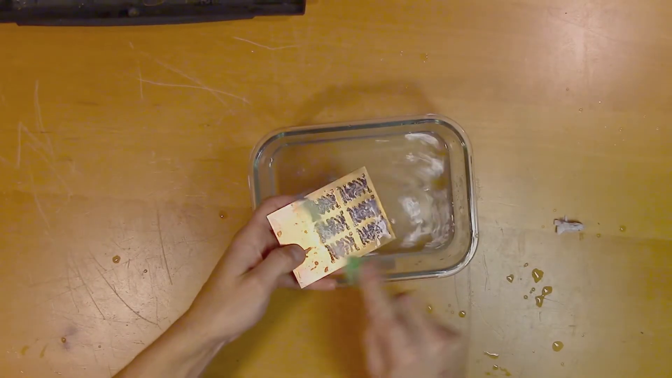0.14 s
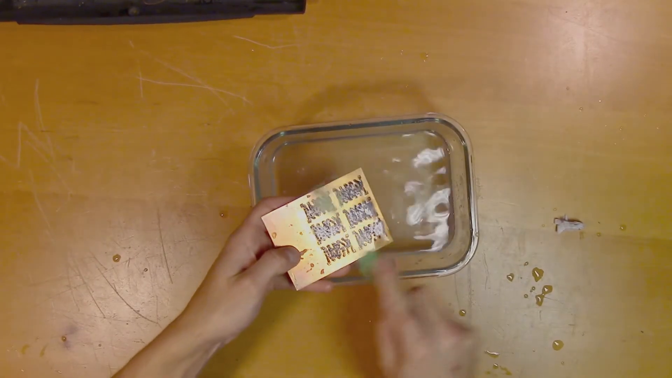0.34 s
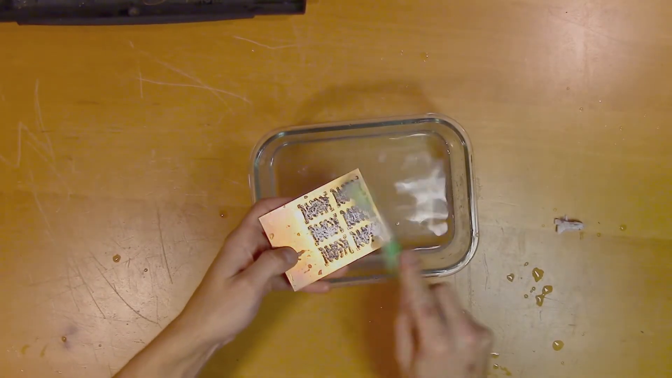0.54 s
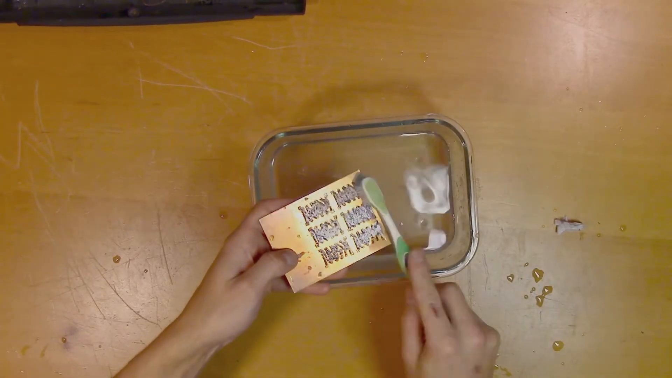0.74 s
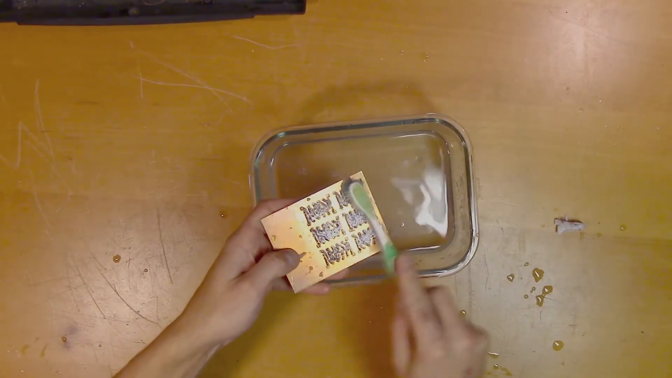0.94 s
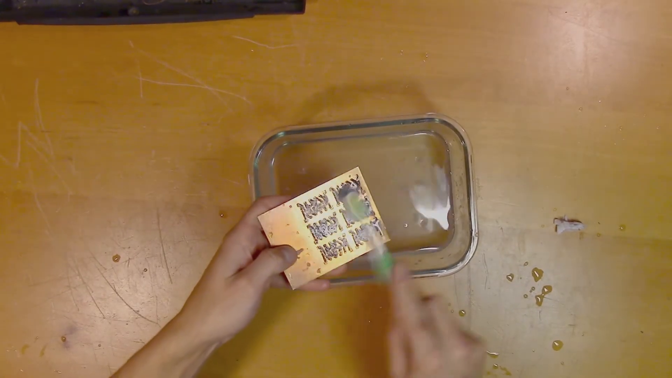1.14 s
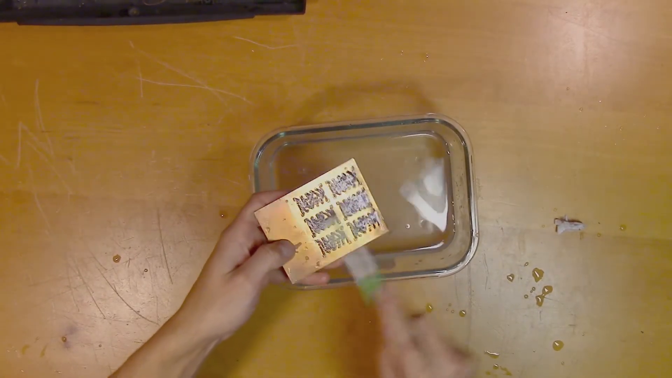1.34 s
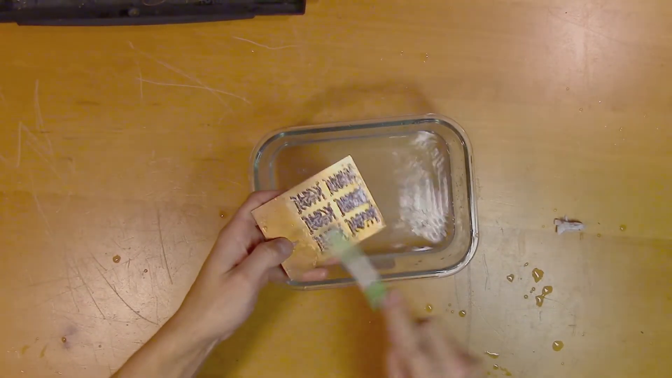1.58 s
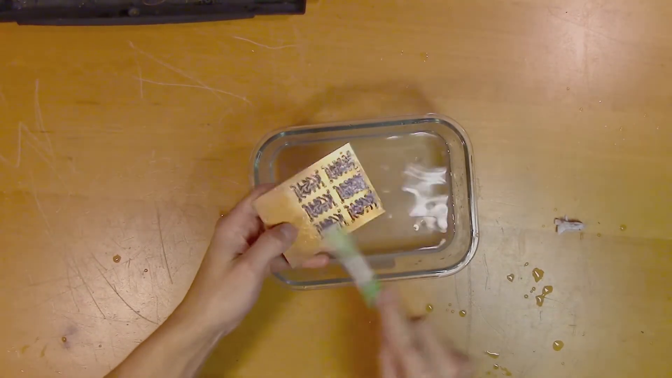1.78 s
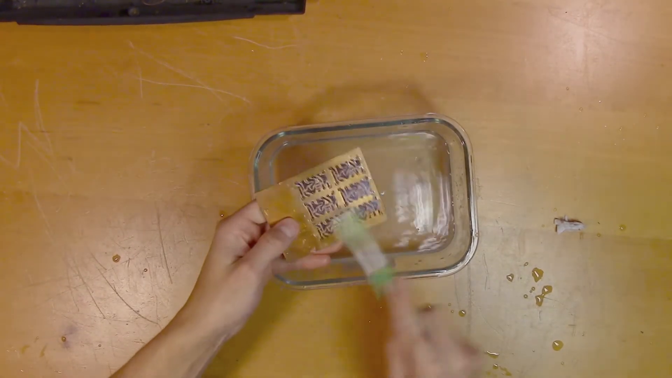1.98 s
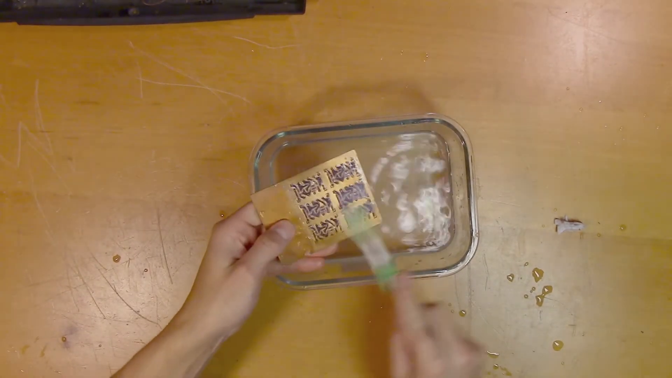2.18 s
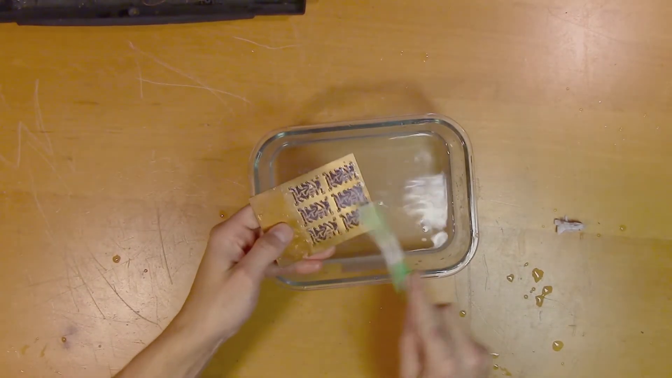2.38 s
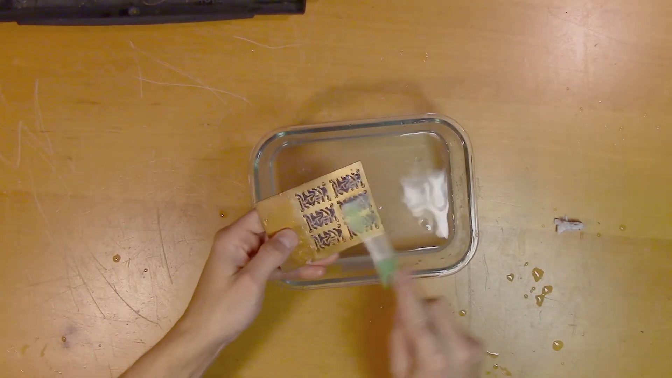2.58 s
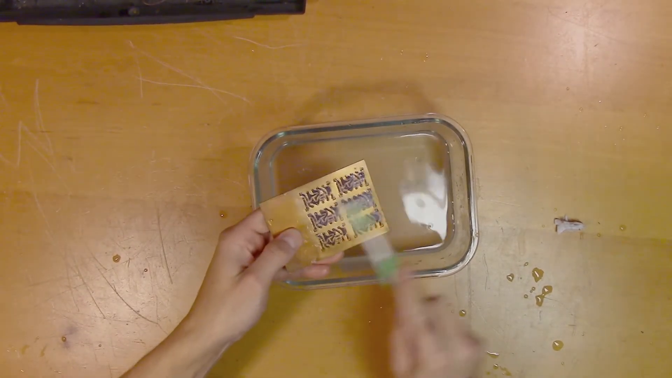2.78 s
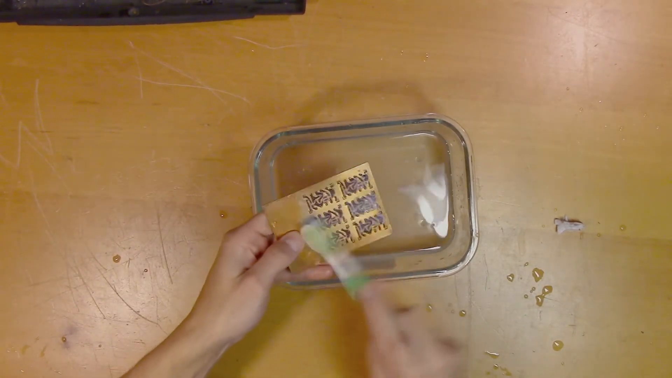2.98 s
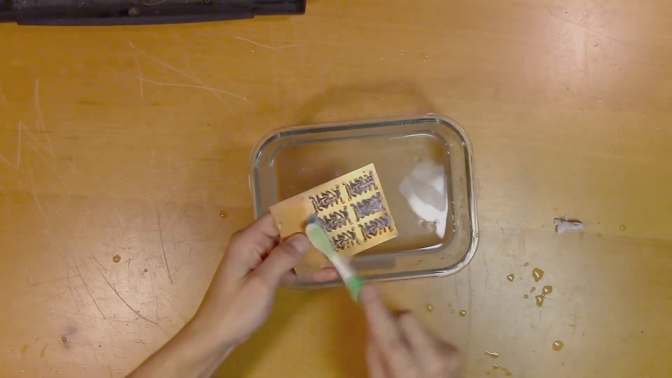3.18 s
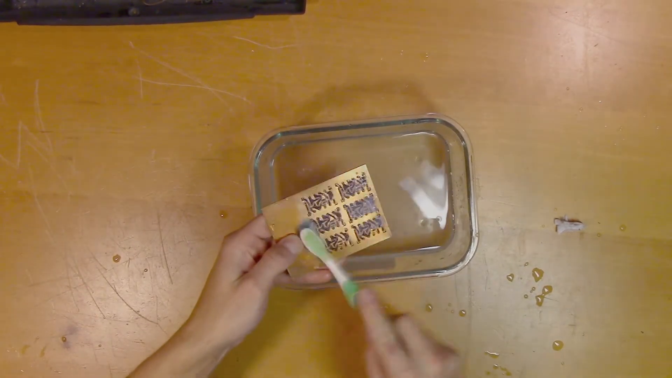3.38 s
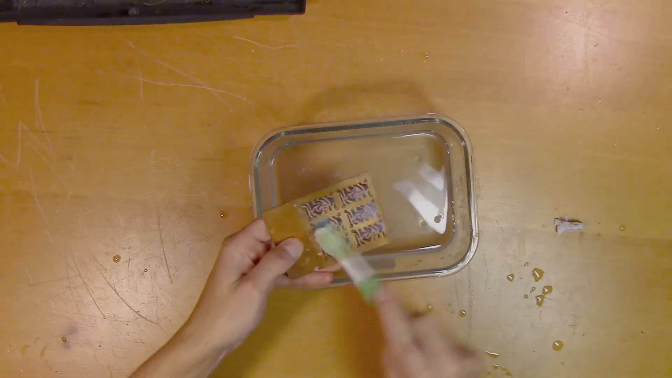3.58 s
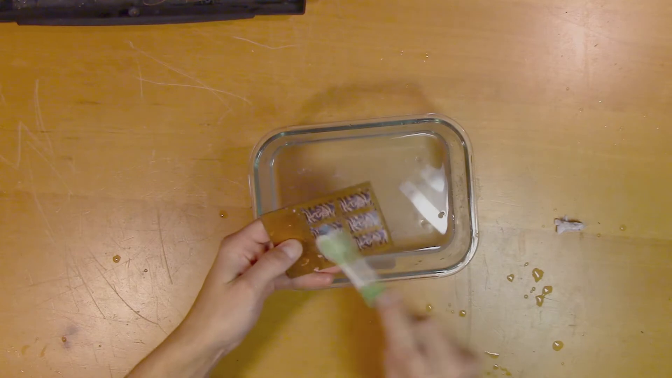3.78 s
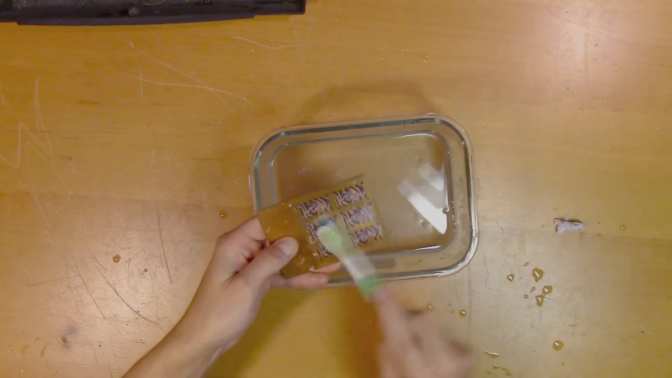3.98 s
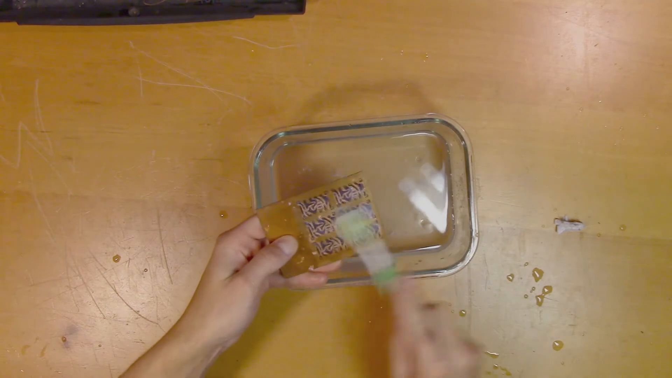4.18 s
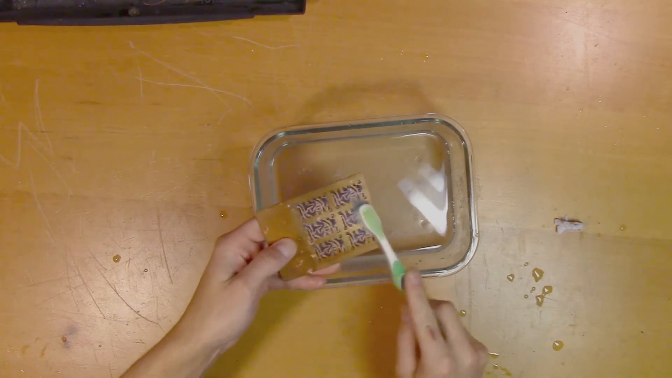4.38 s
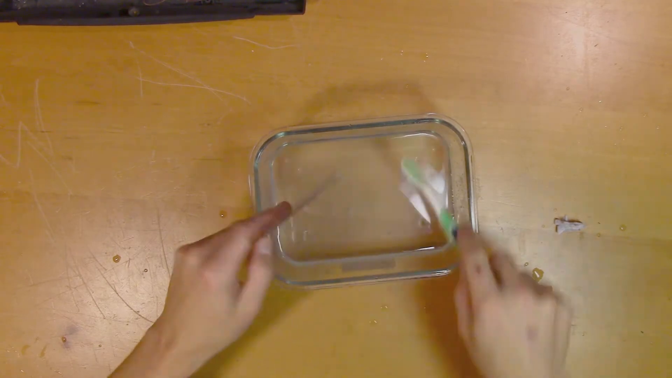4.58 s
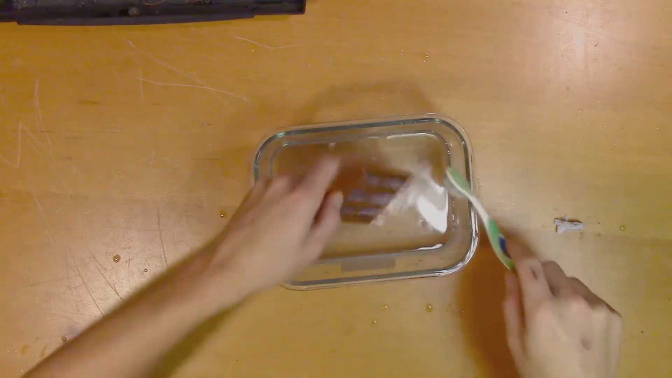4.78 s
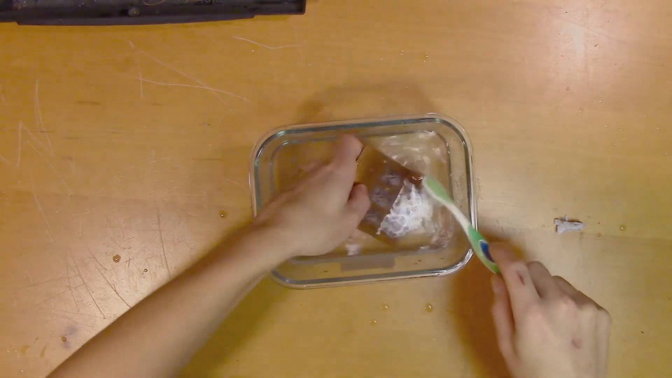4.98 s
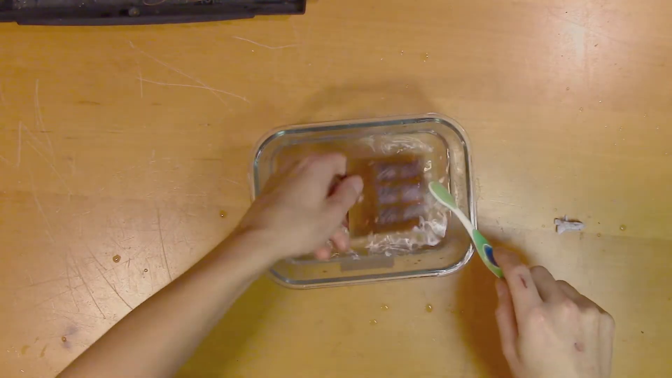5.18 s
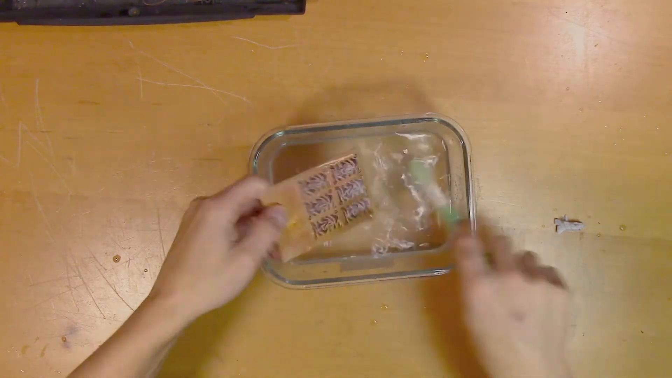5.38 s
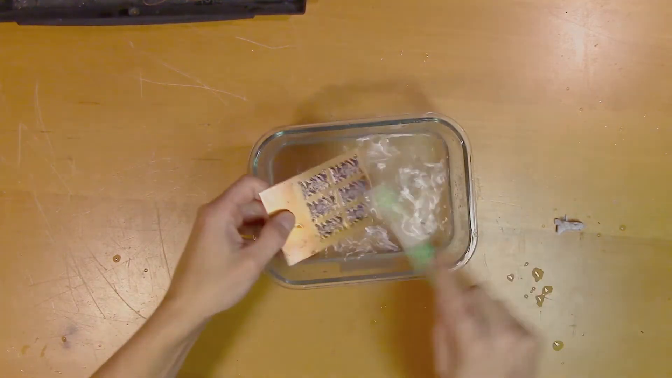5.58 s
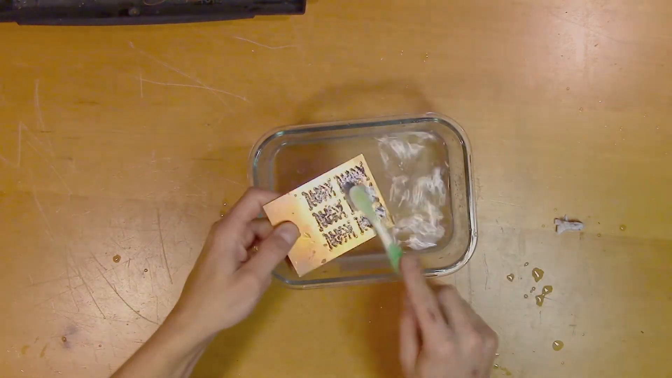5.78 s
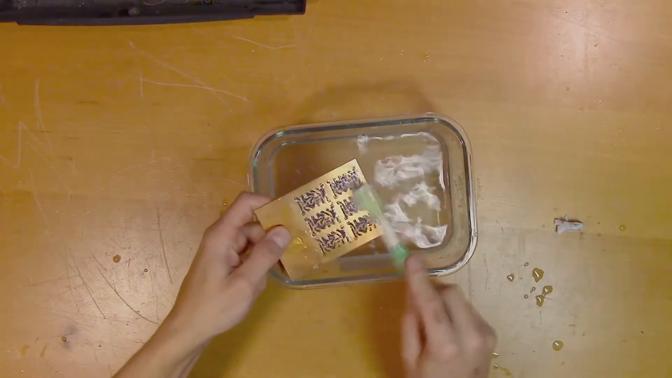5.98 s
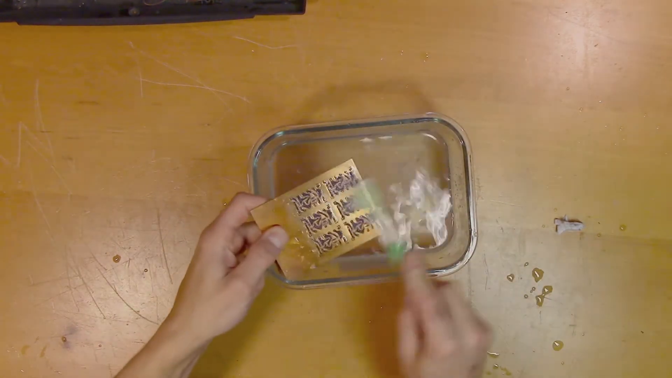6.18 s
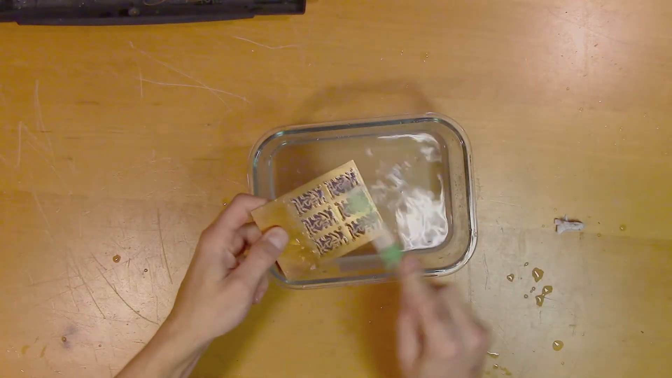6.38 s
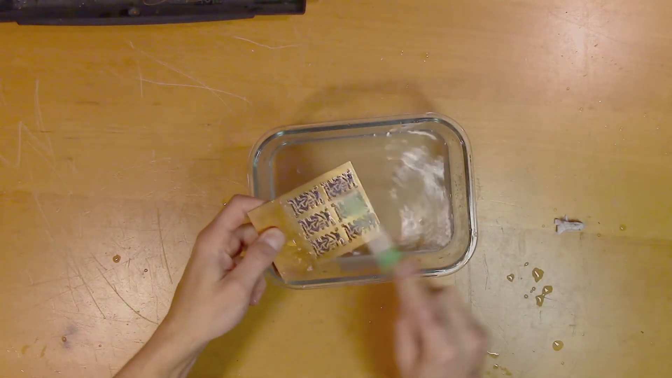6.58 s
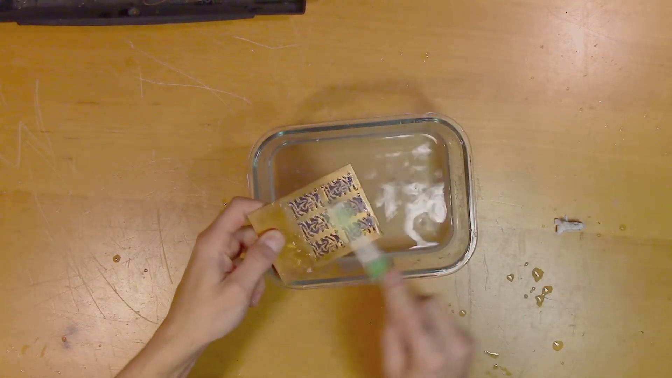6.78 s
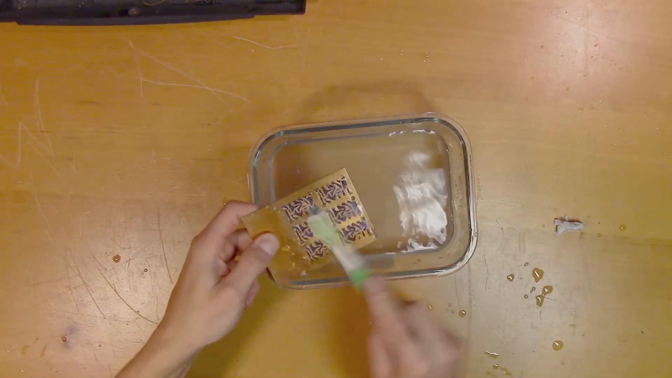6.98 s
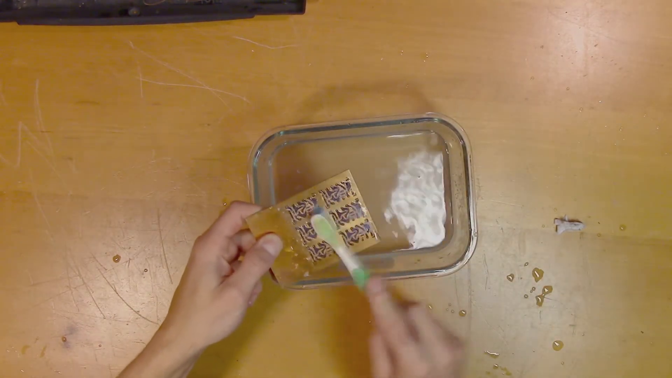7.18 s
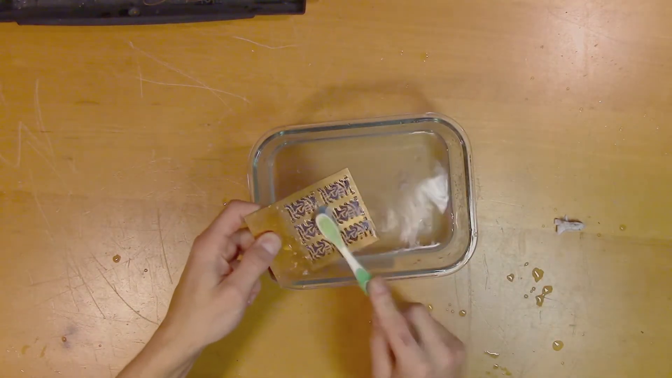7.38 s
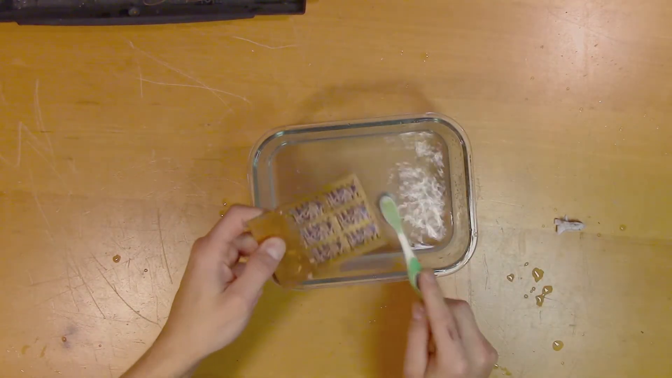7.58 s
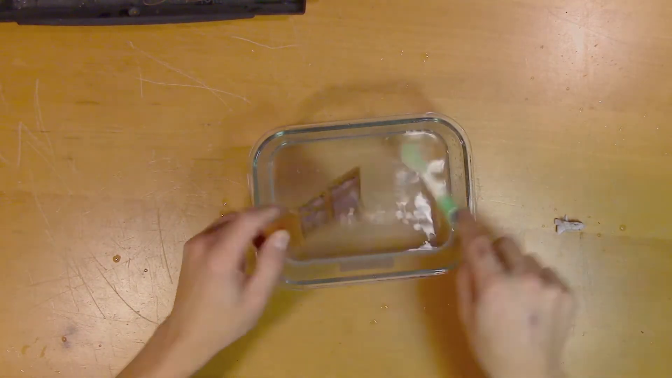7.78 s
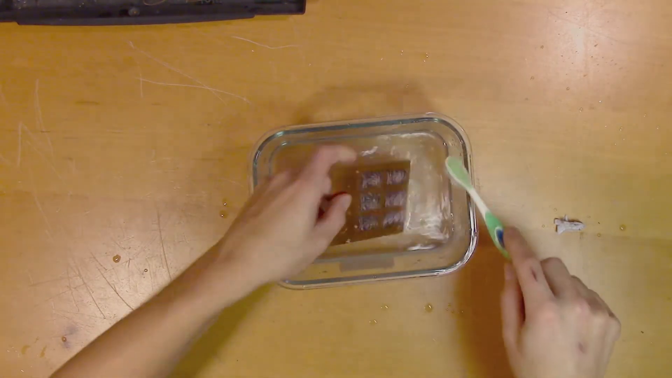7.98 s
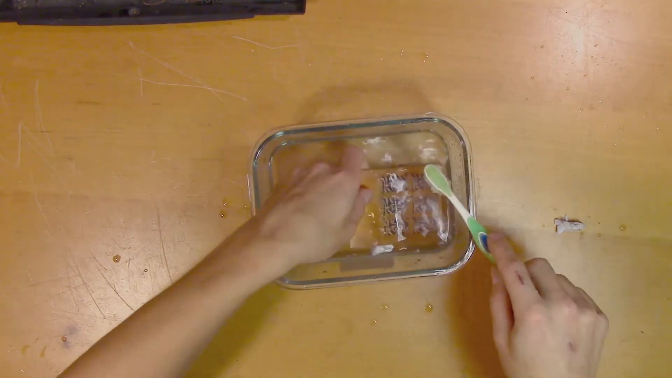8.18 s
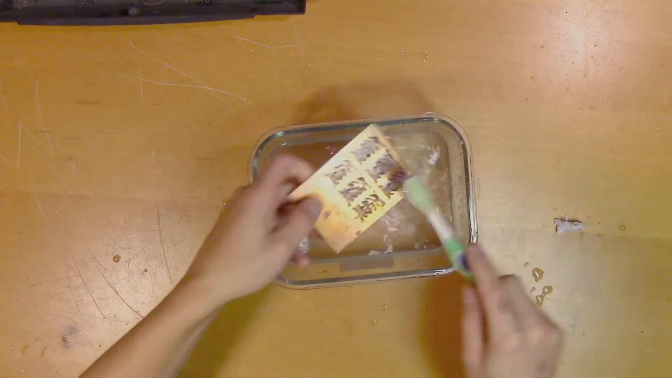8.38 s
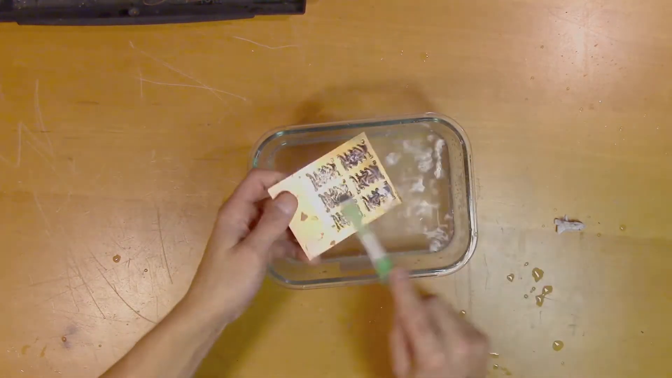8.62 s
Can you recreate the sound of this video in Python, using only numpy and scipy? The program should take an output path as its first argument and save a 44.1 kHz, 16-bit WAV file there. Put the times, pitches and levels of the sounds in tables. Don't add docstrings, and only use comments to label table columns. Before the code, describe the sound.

From 0 to about 4.5 seconds a toothbrush scrubs a wet copper board in rapid push-pull strokes, around twenty a second, each a short bright rasp of fine ticks with a slight metallic colour; strength varies unevenly. A soft bump and tiny tap come near 0.1, and quiet wooden creaks from the bench between 2.6 and 4.5. The scrubbing stops; faint touches at 4.75, then a hard glassy knock at 4.97, the loudest event, with clinks at 5.05 and 5.17, short juddering slides and small drips to 5.5. Scrubbing resumes from 5.7 to 7.45, crisp and steady, ending in a brief drag. A light knock at 7.7, then a clink at 8.05, ticks, a short slide and drops until 8.4. Faint brush touches swell at 8.5 to 8.65. Low steady hum throughout, in a small, fairly dry room, closely miked.

```python
import sys
import numpy as np
from scipy import signal
from scipy.fft import rfft, irfft
from scipy.io import wavfile

SR = 44100
rng = np.random.default_rng(int(sys.argv[2]) if len(sys.argv) > 2 else 0)


def voltage_ratio(decibels):
    exponent = np.asarray(decibels, float) / 20
    return 10 ** exponent


def master(y):
    cut = np.clip(np.atleast_2d(y).T, -1, 1)
    pcm = np.round(cut * 32767)
    wavfile.write(sys.argv[1], SR, pcm.astype(np.int16))


N = 381460

BENCH, BOTTOM, WALL, RIM = range(4)
# pitch_hz, t60_s (time to die by 60 dB),
# then bench_db, bottom_db, wall_db, rim_db (how strongly a blow at each place rings them)
DISH_MODES = [(148, 0.13, -26, -20.5, -33.5, -50), (201.4, 0.096, -27, -13, -21, -44),
              (259.3, 0.1, -14.5, -5, -13.5, -33), (315.5, 0.11, -6, -3.5, -16.5, -28),
              (430, 0.065, -8, -17, -19, -22), (511.6, 0.085, -2.5, 10, -8, -18),
              (579, 0.094, -32, 0, -11, -21), (725, 0.084, -10, -11, -13, -21),
              (856, 0.08, -3, -8, -13, -5), (939, 0.11, -14, -23, -2.5, -5.5),
              (1022, 0.043, -0.5, -7, -1.5, -26), (1186, 0.046, -45, -17, -9, -15),
              (1325, 0.02, -33, 0, -28, -32)]


def rms_one(x):
    return x / np.sqrt(np.mean(x ** 2) + 1e-20)


def at_hz(rows, hz):
    rows = np.array(rows)
    return np.array([np.interp(np.log(hz), np.log(rows[:, 0]), column) for column in rows[:, 1:].T])


def drift(rate):
    r = np.exp(-64 * np.pi * rate / SR)
    noise = rng.standard_normal(N // 32 + 2002)
    slow = signal.lfilter([1], [1, -2 * r, r * r], noise)[2000:]
    return np.interp(np.arange(N) / 32, np.arange(len(slow)), rms_one(slow))


def resonance(x, hz, width_hz):
    r = np.exp(-np.pi * width_hz / SR)
    gain = (1 - r * r) / 2
    return signal.lfilter([gain, 0, -gain], [1, -2 * r * np.cos(2 * np.pi * hz / SR), r * r], x)


def ring(clicks, hz, t60):
    r = voltage_ratio(-60 / (t60 * SR))
    w = 2 * np.pi * hz / SR
    return signal.lfilter([0, np.sin(w)], [1, -2 * r * np.cos(w), r * r], clicks + 1e-18)


def grains(per_s, spread_db):
    sizes = voltage_ratio(spread_db * np.minimum(rng.exponential(1, N), 5)) * rng.choice([-1, 1], N)
    return rms_one(sizes * (rng.random(N) < per_s / SR))


def bands(sources, low_hz):
    edges = low_hz * 2 ** np.arange(0, np.log2(19900 / low_hz), 1 / 3)
    for k, (low, high) in enumerate(zip(edges, edges[1:])):
        band = signal.butter(2, [low, high], "band", fs=SR, output="sos")
        yield np.sqrt(low * high), signal.sosfilt(band, sources[k % 2])


def bursts(rows, rise_db_per_s, fall_db_per_s):
    t, gain = np.arange(N) / SR, np.zeros(N)
    for start, ms, level_db, swell_db in rows:
        near = slice(max(int((start - .03) * SR), 0), int((start + .15) * SR))
        u, length = t[near] - start, ms / 1000
        bite_db = rise_db_per_s * np.minimum(u - .002, 0)
        release_db = -fall_db_per_s * np.maximum(u - length + 0.0083, 0)
        swell = swell_db * (np.clip(u / length, 0, 1) - .5)
        gain[near] += voltage_ratio(level_db + swell + bite_db + release_db)
    return gain


def hum():
    # pitch_hz, level_db (per Hz)
    hum_spectrum = [(24, -22), (100, -26), (172, -13), (406, -7), (564, -3.5), (608, -2), (707, -7),
                    (782, -5), (1200, -8), (1670, -10.5), (1840, -11), (3920, -16), (4680, -17.5),
                    (12500, -23), (16500, -25)]
    level_db = -58
    hz = np.maximum(np.fft.rfftfreq(N, 1 / SR), 1)
    spectrum = rfft(rng.standard_normal(N)) * voltage_ratio(at_hz(hum_spectrum, hz)[0])
    return voltage_ratio(level_db) * rms_one(irfft(spectrum, N))


def room(x):
    t60_s, first_echo_s = 0.18, 0.004
    t = np.arange(SR // 2) / SR
    tail = rng.standard_normal(len(t)) * voltage_ratio(-60 * t / t60_s) * (t > first_echo_s)
    tail = signal.lfilter([1], [1, -.4], tail)
    return signal.fftconvolve(x, tail / np.sqrt(np.sum(tail ** 2)))[:N]


def creaks():
    # start_s, length_ms, level_db, swell_db
    creak_times = [(2.572, 36, -47.5, -2), (2.614, 8.5, -58, -8), (2.662, 31, -53, 5),
                   (2.705, 12, -51.5, 0), (2.733, 28.5, -44.5, 5), (3.132, 53, -44, 6.5),
                   (3.505, 94, -54, -6), (3.613, 44, -44.5, -5), (4.03, 60, -48.5, 4),
                   (4.083, 45.5, -46.5, 0), (4.426, 16, -52, 0), (4.455, 49, -52.5, -4)]
    # pitch_hz, width_hz, level_db
    wood = [(526, 360, -7.5), (702, 120, 5.5), (890, 310, -0.5), (1040, 140, 3), (1250, 180, -8),
            (1610, 82, -11), (2700, 4800, -10.5), (1500, 200, -7)]
    slips = resonance(grains(1200, spread_db=3.5), 1050, 1170)
    sound = np.zeros(N)
    for k, (hz, width, db) in enumerate(wood):
        sound += (-1) ** k * voltage_ratio(db) * resonance(slips, hz, width)
    return bursts(creak_times, 3000, 680) * rms_one(sound)


def slides():
    # start_s, length_ms, level_db, swell_db
    slide_times = [
        (5.103, 65, -45, -1),
        (5.187, 34, -41.5, 4),
        (8.155, 39, -45, 1),
        (8.565, 75, -61.5, -10),
    ]
    slips = resonance(grains(1200, spread_db=3.5), 430, 1000)
    sound = np.zeros(N)
    for k, (hz, t60, _, bottom_db, *_) in enumerate(DISH_MODES[:12]):
        sound += (-1) ** k * voltage_ratio(0.3 * bottom_db) * ring(slips, hz, 0.4 * t60)
    return bursts(slide_times, 1500, 500) * rms_one(sound)


def add(out, s, sound):
    i = int(s * SR)
    out[i:i + len(sound)] += sound[:N - i]


def crack(level_db, hz, t60):
    t, noise = np.arange(SR // 4) / SR, rng.standard_normal(SR // 4)
    dull = signal.butter(2, min(3 * hz, 19000), fs=SR, output="sos")
    wide = signal.sosfilt(dull, noise * voltage_ratio(-60 * t / (.6 * t60)))
    width = 0.21 * hz + 800
    narrow = resonance(resonance(noise * voltage_ratio(-60 * t / t60), hz, width), hz, width)
    return voltage_ratio(level_db) * (voltage_ratio(-8.0) * wide / np.max(np.abs(wide)) + narrow / np.max(np.abs(narrow)))


def dish():
    # pitch_hz, t60_s, bench_db, bottom_db, wall_db, rim_db
    glass = [(1635, 0.55, -46, -37, -27, -5), (1950, 0.08, -28.5, -19, -41, -14.5),
             (2376, 0.097, -35, -27, -37, -6.5), (2512, 0.024, -42, -13, -20, 8.5),
             (2600, 0.083, -50, -17, -32, -5.5), (2645, 0.17, -62, -2, -23, -6.5),
             (2810, 0.072, -45, -25, -36, -11), (3750, 0.11, -50, -24, -28, -23),
             (4194, 0.14, -43, -35, -43, -8),
             (4640, 0.08, -50, -28, -45, -34), (5330, 0.05, -50, -38, -37, -28),
                  (5600, 0.056, -52, -34, -49, -19), (6142, 0.058, -49, -18, -38, -20),
                  (6730, 0.13, -46, -36, -37, -36), (7570, 0.066, -52, -38, -50, -26),
                  (8370, 0.095, -41, -40, -47, -17), (11600, 0.092, -55, -44, -51, -35),
                  (10300, 0.1, -55, -42, -50, -35)]
    # start_s, place (0 bench, 1 bottom, 2 wall, 3 rim), ring_db, crack_db, crack_hz
    blow_rows = [(0.099, BENCH, -25, -32, 590), (4.54, WALL, -50, -38, 1040), (4.753, WALL, -49, -39, 1500),
                 (4.764, WALL, -57, -45, 2600), (4.953, BENCH, -33.5, -35, 600),
                 (4.9663, WALL, -17.5, -9, 720), (4.9727, BOTTOM, -20.5, -9.5, 494),
                 (4.975, RIM, -25.5, -16.5, 2700), (5.052, RIM, -31, -39, 11000),
                 (5.168, RIM, -38, -20, 4850), (7.446, WALL, -64, -41, 2010),
                 (7.682, WALL, -17.5, -24, 1000), (8.0524, RIM, -22, -20.5, 2300),
                 (8.139, RIM, -35.5, -19, 4800)]
    # start_s, ring_db, pitch_hz
    tap_rows = [(.056, -36.5, 5600), (1.85, -45, 4194), (1.851, -40, 4950), (8.052, -35, 4194),
                (4.797, -53, 4194), (4.822, -57, 4194), (4.848, -57, 4194), (5.0522, -30, 5330),
                (5.1684, -41, 1635), (5.0525, -35, 2510), (5.169, -40, 4194), (5.441, -52.5, 4194),
                (5.456, -54, 1635), (8.118, -51, 5330), (8.257, -44.5, 5300), (8.259, -45.5, 2810),
                (8.278, -58, 4194)]
    # start_s, splash_db, pitch_hz
    drop_rows = [(4.882, -53, 5300), (4.968, -25, 6142), (5.0527, -28, 5330), (5.104, -49, 9200),
                 (5.168, -36, 13000), (5.1692, -31, 5600), (5.301, -38, 10300), (5.44, -35, 7860),
                 (5.454, -48, 2420), (5.494, -44, 5600), (7.963, -51, 4300), (7.976, -50, 2380),
                 (4.968, -34, 11500), (8.0522, -30.5, 7950), (8.325, -54, 4200), (7.524, -54, 4600),
                 (8.137, -42, 4800), (8.1385, -30.5, 12500), (8.247, -42, 3830), (8.3, -34.5, 12600),
                 (8.367, -31, 6730)]
    crack_t60_s = (0.11, 0.07, 0.1, 0.039)
    tap_crack_db, tap_t60_s = -15, 0.036
    drop_ring_db, drop_t60_s = -12, 0.04

    # (start s, ring dB, crack dB, Hz, t60 s)
    light = [(s, db, db + tap_crack_db, hz, tap_t60_s) for s, db, hz in tap_rows]
    light += [(s, db + drop_ring_db, db, hz, drop_t60_s) for s, db, hz in drop_rows]
    blows, touches = np.array(blow_rows), np.array(light)
    at = (np.r_[blows[:, 0], touches[:, 0]] * SR).astype(int)
    out, t = np.zeros(N), np.arange(N) / SR
    for hz, t60, *place_db in DISH_MODES + glass:
        by_place = blows[:, 2] + np.array(place_db)[blows[:, 1].astype(int)]
        by_pitch = touches[:, 1] - 60 * np.abs(np.log2(hz / touches[:, 3]))
        fed = np.bincount(at, voltage_ratio(2 * np.r_[by_place, by_pitch]), N)
        energy = signal.lfilter([1], [1, -voltage_ratio(-120 / (t60 * SR))], fed + 1e-18)
        speed = hz / SR * 2
        swing = signal.lfilter([speed], [1, speed - 1], np.sqrt(energy))
        out += swing * np.sin(2 * np.pi * (hz * t + rng.random()))
    for s, place, _, level_db, hz in blow_rows:
        add(out, s, crack(level_db, hz, crack_t60_s[place]))
    for s, _, level_db, hz, t60 in light:
        add(out, s, crack(level_db, hz, t60))
    return out


def strokes():
    # start_s, level_db
    first_bout = [(-.022, -42), (.122, -45.5), (.32, -44.5), (.649, -46.5), (1.032, -43.5), (1.366, -43.5),
                  (1.604, -46), (2.354, -47.5), (2.502, -54.5), (2.654, -45.5), (2.907, -41), (3.273, -42),
                  (3.614, -40), (3.711, -45), (3.966, -43), (4.254, -46.5), (4.472, -45.5)]
    second_bout = [(5.679, -59), (5.839, -46), (6.188, -44), (6.294, -45.5), (6.698, -45.5), (7.067, -43.5),
                   (7.427, -45.5)]
    first_count = [0, 3, 7, 14, 22, 29, 34, 49, 52, 55, 60, 67, 74, 76, 81, 87, 92]
    second_count = [0, 3, 10, 12, 20, 27, 34]
    # early_ms (earlier and longer), louder_db
    push_rows = [
        (1.5, -0.4),
        (4.0, -0.6),
    ]
    # start_s, change_db
    accents = [(.22, 4), (1.03, 0), (1.08, -2), (1.22, -0.5), (1.37, 1.5), (1.65, 1), (1.80, 0), (1.85, -1),
               (2.26, 0.5), (2.40, 5), (2.45, 2), (2.75, -1.5), (2.80, 1.5), (2.85, -2), (3.065, 1),
               (3.22, -1.5), (3.66, -5), (3.91, 2.5), (3.965, -1), (4.01, 4), (4.11, -1), (4.16, -1.5),
               (4.21, 2.5), (4.30, 2.5), (4.34, -0.5), (5.73, 4.5), (5.99, -2.5), (6.24, -2.5), (6.75, 0),
               (7.12, -2.5)]
    # start_s, length_ms, level_db, swell_db
    last_strokes = [
        (7.447, 25, -46.5, 6),
        (8.505, 73, -61, -5),
        (8.572, 32, -60, 15),
        (8.627, 35, -52, 11),
    ]
    # start_ms, length_ms, level_db, swell_db
    uneven = (0.27, 2.9, 0.34, 2.7)
    contact_share, swell_db = 0.57, 1.5

    rows = list(last_strokes)
    accent_s, accent_db = np.transpose(accents)
    bouts = [(first_bout, first_count), (second_bout, second_count)]
    for (bout, count), (early_ms, push_db) in zip(bouts, push_rows):
        n = np.arange(count[-1] + 1)
        start, level_db = (np.interp(n, count, column) for column in np.transpose(bout))
        accented = np.abs(start[:, None] - accent_s) < .02
        level_db = level_db + accented @ accent_db
        push = .5 - n % 2
        chance = (rng.standard_normal((len(n), 4)) * uneven).T
        start_s = start + (chance[0] - push * early_ms) / 1000
        ms = contact_share * 1000 * np.gradient(start) + push * early_ms + chance[1]
        rows += zip(start_s, ms, level_db + push * push_db + chance[2], swell_db + chance[3])
    return rows


def brush():
    # start_s, hold (0 to 2)
    hold_times = [
        (1.8, 0),
        (2.5, 1),
        (4.5, 1),
        (5.0, 2),
        (7.6, 2),
        (8, 0),
    ]
    # pitch_hz, hold_0_db, hold_1_db, hold_2_db (per Hz)
    bristles = [(900, -16.5, -22, -9), (1440, -13, -16, -17), (2220, -6, -13.5, -23),
                (2700, -9.5, -5.5, -9), (3440, -12, -18.5, -9), (4500, -8.5, -4, -1),
                (6300, -1.5, -4.5, -2.5), (8400, -2, -1.5, -2.5), (11000, -4, -5.5, -5.5),
                (14700, -3, -4, -6), (16400, -7.5, -10.5, -5)]
    # pitch_hz, width_hz
    board_modes = [(1980, 220), (2385, 110), (4200, 70), (5100, 80), (5960, 110), (6430, 90), (7300, 90),
                   (9320, 80), (9730, 60), (11750, 110), (13450, 130)]
    # hold_0_db, hold_1_db, hold_2_db
    board_levels = [(-3, -8, -7), (-2, -1.5, 7.5), (-1.5, -2.5, -5), (-10, -8, -11), (6, -8, -1.5),
                    (-3, -0.5, -0.5), (2, -0.5, -3), (-3, -5, 4), (-1, 1, 0), (-11, -3, -0.5),
                    (-15, -7, -7)]

    pressure = bursts(strokes(), 2440, 873)
    hold = np.interp(np.arange(N) / SR, *np.transpose(hold_times))
    ticks = [grains(18000, spread_db=3.0), grains(18000, spread_db=2.0)]
    sound = np.zeros(N)
    for hz, part in bands(ticks, 769):
        level_db = np.interp(hold, [0, 1, 2], at_hz(bristles, hz))
        sound += voltage_ratio(level_db + 2.16 * drift(28)) * part
    for k, ((hz, width), db) in enumerate(zip(board_modes, board_levels)):
        level_db = np.interp(hold, [0, 1, 2], db)
        sound += voltage_ratio(level_db + 1.74 * drift(11)) * resonance(ticks[k % 2], hz, width)
    return pressure * voltage_ratio(1.44 * drift(120)) * rms_one(sound)


def scene():
    near = brush() + dish() + creaks() + slides()
    no_bass = signal.butter(4, 150, "high", fs=SR, output="sos")
    near = signal.sosfilt(no_bass, near)
    mid = near + voltage_ratio(-15) * room(near) + hum()
    dull = signal.butter(1, 2500, fs=SR, output="sos")
    bright = signal.butter(2, 5000, "high", fs=SR, output="sos")
    side = voltage_ratio(-7) * signal.sosfilt(dull, hum())
    side += voltage_ratio(-29.5) * signal.sosfilt(bright, room(near))
    return np.array([mid + side, mid - side])


def roll_off(x):
    return signal.sosfilt(signal.butter(12, 16820, fs=SR, output="sos"), x)


def record(dry):
    rounded = 1.5 * np.tanh(dry / 1.5)
    top_cut = signal.cheby2(12, 40, 16300, fs=SR, output="sos")
    mix = signal.sosfilt(top_cut, rounded)
    mix = mix + voltage_ratio(-100) * rng.standard_normal(mix.shape)
    return roll_off(mix)


dry = scene()
out = record(dry)
master(out)
```